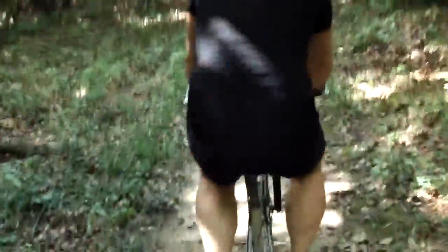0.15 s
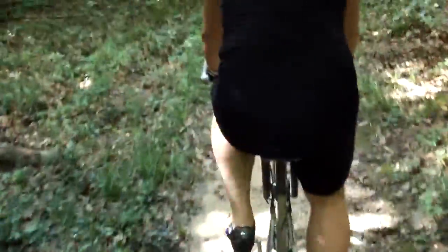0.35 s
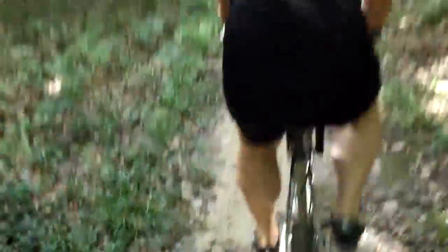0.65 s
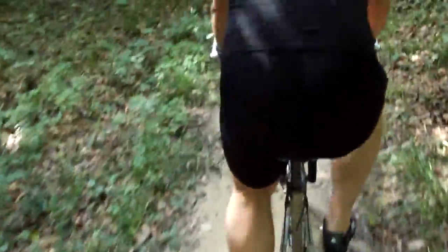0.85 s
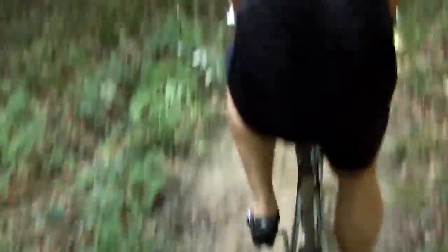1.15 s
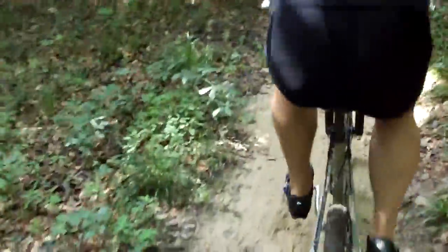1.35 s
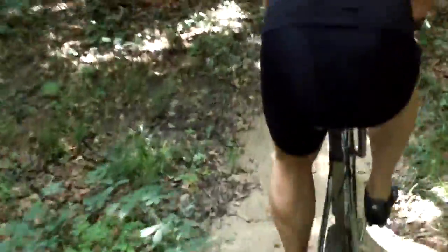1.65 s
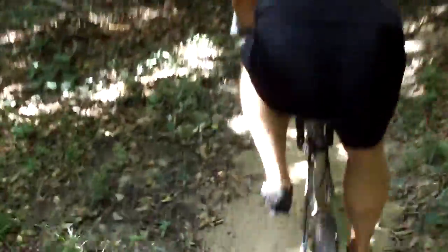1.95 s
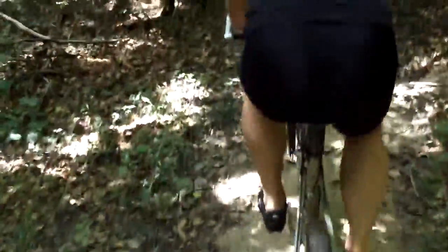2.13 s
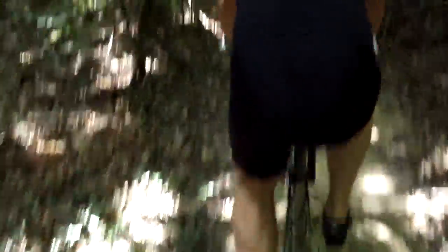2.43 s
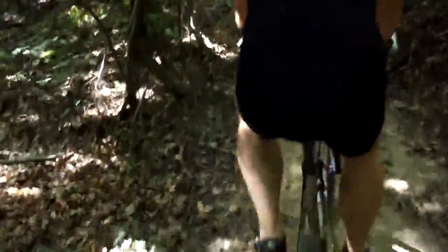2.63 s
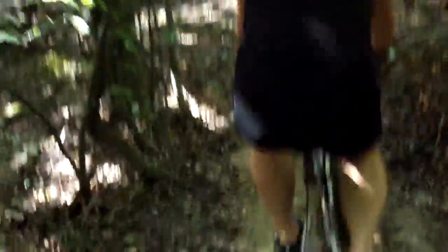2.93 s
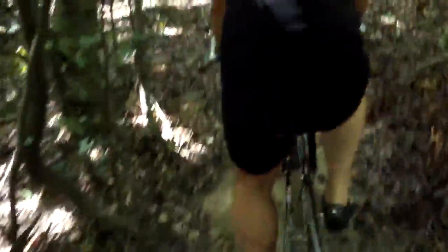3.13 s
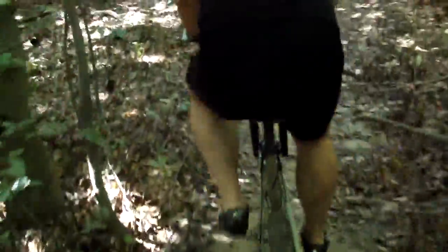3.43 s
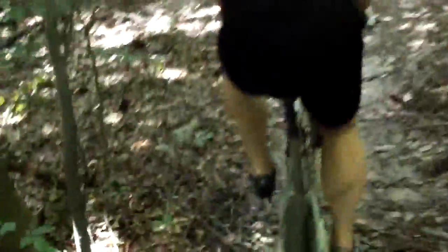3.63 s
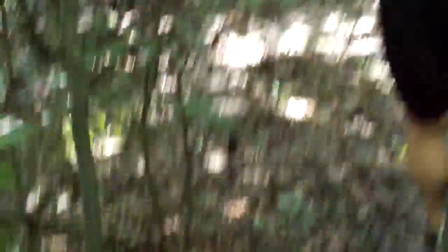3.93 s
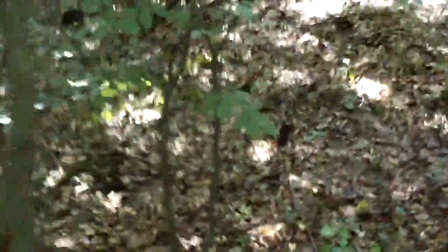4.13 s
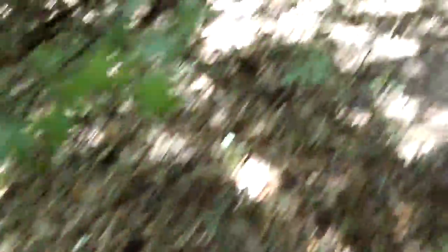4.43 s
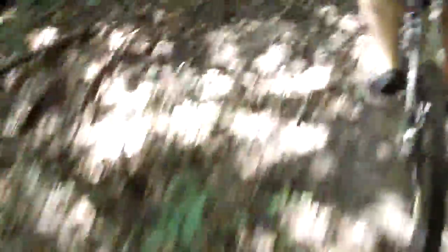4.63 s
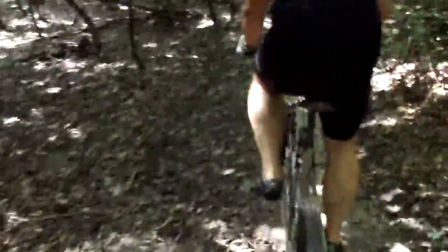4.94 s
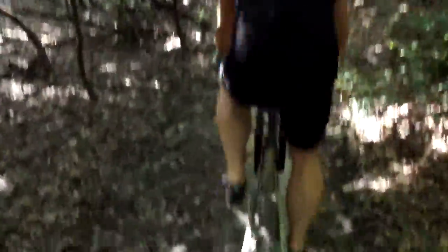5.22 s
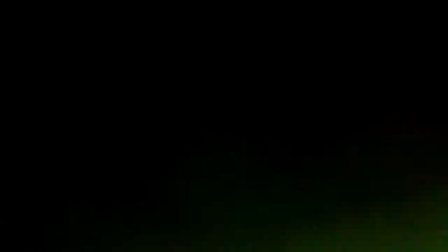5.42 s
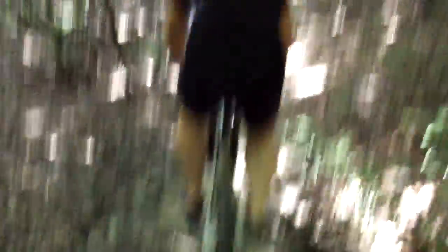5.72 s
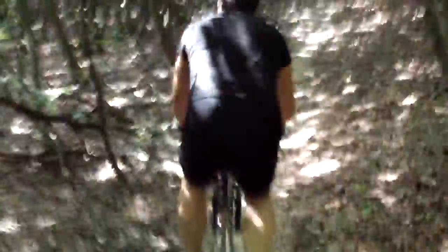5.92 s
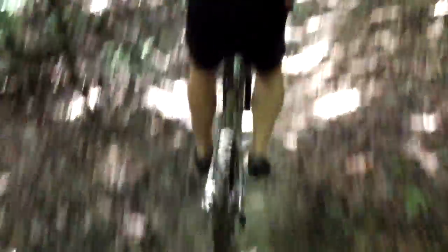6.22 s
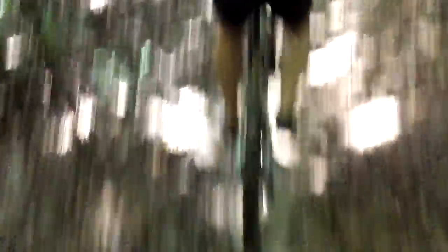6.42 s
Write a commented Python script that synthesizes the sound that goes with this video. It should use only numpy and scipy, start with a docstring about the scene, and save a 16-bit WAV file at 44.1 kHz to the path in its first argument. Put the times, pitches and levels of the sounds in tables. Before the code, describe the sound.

Steady leafy crunch and mount rattle of a mountain bike ride, a brush through twigs, a violent hollow knock, then quieter bumpy coasting.

```python
"""A leafy forest trail, heard from a camera on a mountain bike. Almost mono.
Tyres crackle over leaves (dense random pops), bumps knock the camera in its mount and sticks ring the
frame (struck resonances). Twigs snap, sharp clicks tick and one branch whacks the housing (noise bursts
through its resonances), thumps deeply and scrapes along it. Wind puffs (deep noise), a freewheel ticks
and tiny squeaks glide. Automatic gain dips after loud sound, most of all at the whack, and creeps back."""
import sys
import numpy as np
from scipy import signal
from scipy.fft import rfft, irfft, next_fast_len
from scipy.io import wavfile
from scipy.ndimage import uniform_filter1d

SR = 44100
rng = np.random.default_rng(int(sys.argv[2]) if len(sys.argv) > 2 else 0)


def int16_out(signal):
    """Quantize to a 16-bit WAV file."""
    q = np.round(np.clip(np.atleast_2d(signal).T, -1, 1) * 32767)
    wavfile.write(sys.argv[1], SR, q.astype(np.int16))


N = 289737  # length in samples


def undb(db):
    """Turn decibels into a gain."""
    return 10 ** (np.asarray(db) / 20)


def unit(x):
    """Scale a sound to an rms of 1."""
    return x / np.sqrt(np.mean(x ** 2))


def curves(table):
    """Draw each column as a line over time, using the first column as t/s."""
    s, *columns = np.transpose(table)
    t = np.arange(N) / SR
    return [np.interp(t, s, column, column[0], column[-1]) for column in columns]


def colour(x, points):
    """Shape a steady sound by a spectrum that falls off steeply past its ends; the rms becomes 1."""
    hz, db = np.transpose(points)
    size = next_fast_len(N)
    log_f = np.log(np.maximum(np.arange(size // 2 + 1) * SR / size, 1))
    below = np.maximum(np.log(hz[0]) - log_f, 0)
    above = np.maximum(log_f - np.log(hz[-1]), 0)
    gain = undb(np.interp(log_f, np.log(hz), db) - 30 * (below + above))
    return unit(irfft(rfft(x, size) * gain, size)[:N])


def ring(x, modes):
    """Drive resonances (f/Hz, width/Hz, level/dB) that pass no steady push; wider ones die sooner."""
    out = 0
    for hz, width, db in modes:
        r = np.exp(-np.pi * width / SR)
        w = 2 * np.pi * hz / SR
        out = out + undb(db) * signal.lfilter([.5, 0, -.5], [1, -2 * r * np.cos(w), r * r], x)
    return out


def soften(x, modes):
    """Pass a sound twice through its resonances: the ring swells for a few cycles and its skirts drop."""
    once = ring(x, modes)
    hit = ring(np.eye(1, 2048)[0], modes)
    return ring(once, modes) / np.abs(ring(hit, modes)).max()


def walk(rate):
    """Glide between random levels, one every 1 / rate s."""
    k = int(SR / rate)
    held = np.repeat(rng.standard_normal(N // k + 1), k)
    return uniform_filter1d(held, k)[:N]


def grains(rate, spread_db, flicker_db):
    """Leaves cracking: dense one-sample pops (rate per s) of uneven but bounded size, in patches."""
    size_db = spread_db * np.minimum(rng.exponential(size=N), 5.0)
    pops = (rng.random(N) < rate / SR) * rng.standard_normal(N) * undb(size_db)
    return pops * undb(0.8 * flicker_db * walk(24.946) + flicker_db * walk(70))


def bursts(times, db, length, spike=0., grit=0.):
    """Noise bursts that die away; spike adds a hard first contact, grit splinters the noise."""
    length = np.clip(length, .0002, .03)  # fade time in s
    size = int(8 * length.max() * SR)
    out, t = np.zeros(N + size), np.arange(size) / SR
    noise = rng.standard_normal((len(times), size))
    noise = noise * np.abs(noise) ** grit
    for s, gain, fade, grain in zip(times, undb(db), length, noise):
        blow = grain * np.exp(-t / fade) * (1 - np.exp(-t / (0.12 * fade)))
        blow = blow / np.sqrt(np.sum(blow ** 2))
        blow[0] = spike
        start = int(s * SR)
        out[start:start + size] += gain * blow
    return out[:N]


def narrow_hiss():
    """A faint, narrow band of high hiss: noise through one sharp resonance."""
    band = ring(rng.standard_normal(N), [(7940, 150, 0)])  # f/Hz, width/Hz, level/dB
    return undb(-76) * unit(band)


# wind puffs, and the deep thump of the branch's whack near 5.4 s: (middle t/s, length/s, level/dB)
PUFFS_AND_THUMP = [(1.059, 0.031, -49.5), (1.111, .04, -53), (1.215, 0.03, -48), (1.247, 0.026, -41),
                   (1.756, 0.071, -58), (2.259, 0.039, -53), (2.298, .02, -61), (3.189, 0.031, -52),
                   (3.216, 0.044, -51), (3.288, 0.047, -52.5), (3.321, 0.034, -58), (3.726, 0.043, -53),
                   (5.413, 0.032, -32), (5.46, 0.05, -29), (6.488, 0.023, -46)]
# tone of the draught, puffs and thump: (f/Hz, relative level/dB)
DEEP_TONE = [(20, 8), (50, 0), (100, -3), (170, -3), (300, -8.5), (450, -25.5)]


def wind_and_thump():
    """A light draught, wind puffs and the deep thump of the whack: deep noise that swells and fades."""
    t = np.arange(N) / SR
    swell = undb(-80.5 + 3.5 * walk(3.7))  # the draught
    for s, length, db in PUFFS_AND_THUMP:
        swell = swell + undb(db) * np.exp(-(2 * (t - s) / length) ** 4)
    return swell * colour(rng.standard_normal(N), DEEP_TONE)


# gliding chirps: (start t/s, from f/Hz, to f/Hz, peak level/dB)
CHIRPS = [(.455, 12400, 13190, -62), (.655, 10900, 9800, -56), (2.935, 12500, 13000, -66)]


def squeaks():
    """Tiny, very high chirps: short sine tones whose pitch glides."""
    size = int(.022 * SR)
    out = np.zeros(N)
    for s, from_hz, to_hz, db in CHIRPS:
        tone = np.sin(2 * np.pi * np.cumsum(np.linspace(from_hz, to_hz, size)) / SR)
        start = int(s * SR)
        out[start:start + size] += undb(db) * np.hanning(size) * tone
    return out


# turning of the freewheel: (t/s, ratchet teeth passed so far)
TEETH_PASSED = [(4.68, -4), (4.86, 0), (4.97, 4), (5.128, 8), (5.26, 12), (5.45, 16), (5.805, 25),
                (5.938, 30), (6.57, 51.3)]
# ring of the pawl: (f/Hz, width/Hz, level/dB)
PAWL_RING = [(9800, 280, -1.5), (9300, 290, -0.5), (11800, 900, -12.5), (7600, 900, -4)]
PAWL_DB, PAWL_RISE_DB_PER_S, PAWL_SPREAD_DB = -57, 3, 2.5


def freewheel():
    """While coasting, the pawl drops behind each ratchet tooth and rings briefly, louder as time goes on."""
    teeth = np.floor(curves(TEETH_PASSED)[0])
    drops = np.flatnonzero(np.diff(teeth) > 0) / SR
    rise_db = PAWL_RISE_DB_PER_S * (drops - TEETH_PASSED[0][0])
    size_db = PAWL_DB + rise_db + PAWL_SPREAD_DB * rng.standard_normal(len(drops))
    return ring(bursts(drops, size_db, np.full(len(drops), .0015)), PAWL_RING)


# rolling tyres: (t/s, crunch level/dB, rumble level/dB, crispness level/dB)
ROLLING = [(0, -48.5, -49, -59), (.13, -47.5, -53, -60.5), (.23, -44.5, -48.5, -59), (.38, -47, -56, -60),
           (.55, -44, -55.5, -58.5), (.75, -45.5, -56, -57.5), (.9, -43.5, -53, -55.5),
           (1.22, -45, -51.5, -55.5), (1.33, -51, -52, -59.5), (1.5, -44.5, -53, -53.5),
           (1.63, -48.5, -55.5, -55.5), (1.8, -45, -49, -53.5), (2.0, -46, -59.5, -57),
           (2.65, -47.5, -59.5, -56.5), (2.9, -46.5, -53.5, -55.5), (3.38, -47, -58.5, -54),
           (3.5, -44.5, -57, -49.5), (3.87, -51, -59, -57), (4.0, -49, -40.5, -48.5),
           (4.13, -43.5, -45, -50.5), (4.25, -47.5, -48, -49), (4.4, -52, -55.5, -58.5),
           (4.75, -57, -53, -62.5), (5.4, -59.5, -57, -64.5), (5.51, -60.5, -53, -63.5),
           (5.59, -50, -44, -51), (5.68, -53.5, -50.5, -61.5), (5.85, -53.5, -51.5, -61),
           (6.2, -55.5, -53, -63), (6.26, -59.5, -49, -61.5), (6.36, -53.5, -48, -63),
           (6.47, -51.5, -47.5, -53), (6.57, -65, -53, -68)]
# tone of the crunching leaves: (f/Hz, relative level/dB)
LEAF_TONE = [(530, -7.5), (900, -3.5), (1140, -6), (1240, 1.5), (1340, -2), (1700, -1.5), (2090, -2),
             (3290, 0), (7000, -24), (9100, -66), (15400, -120)]
# tone of the ground rumble: (f/Hz, relative level/dB)
GROUND_TONE = [(140, -42.5), (240, 0.5), (470, 6.5), (668, 3.5), (756, 7.5), (840, 4), (1340, 1),
               (1700, -1), (2210, -12), (3740, -120)]
# tone of the crisp top: (f/Hz, relative level/dB)
CRISP_TONE = [(3240, -5.5), (5500, -7), (8150, -11), (14100, -23), (15500, -34.5), (15800, -32.5),
              (16000, -47)]
PATCHY_DB, PATCHES_PER_S = 1, 8  # the litter lies thicker and thinner


def tyres():
    """Leaves crackle as crowds of tiny pops, the ground rumbles through the frame, and the top is crisp."""
    crunch_db, rumble_db, crisp_db = curves(ROLLING)
    patch_db = PATCHY_DB * walk(PATCHES_PER_S)
    leaves = grains(rate=9000., spread_db=-0.5, flicker_db=1.34)
    rumble = grains(rate=4000., spread_db=2.0, flicker_db=1.63)
    fine = leaves + 3.7 * grains(rate=14000., spread_db=-0.6, flicker_db=0.7)
    rumble_db = rumble_db + 1.4 * PATCHY_DB * walk(PATCHES_PER_S)  # patchier than the leaves
    return (undb(crunch_db + patch_db) * colour(leaves, LEAF_TONE)
            + undb(rumble_db) * colour(rumble, GROUND_TONE)
            + undb(crisp_db + patch_db) * colour(fine, CRISP_TONE))


# bumps through the mount: (t/s, clack level/dB, knock level/dB, thud level/dB)
JOLTS = [(0.06, -34.5, -43, -47), (0.1995, -35, -39, -46), (0.2616, -38, -41, -58),
         (0.3007, -27.5, -29.5, -39), (0.6775, -56, -42, -56), (0.9189, -33, -39, -67),
         (0.947, -31, -36, -58), (1.344, -31, -34, -42.5), (1.3611, -50, -48, -67),
         (1.515, -45, -36.5, -50), (1.6498, -28.5, -60, -41), (1.764, -39, -34, -51),
         (1.892, -55, -51, -48), (1.9746, -36, -49, -55), (2.0874, -39, -38, -52), (2.5153, -56, -42, -48),
         (2.6449, -26.5, -23.5, -42.5), (2.86, -56, -54, -47.5), (2.982, -51, -58, -47),
         (3.1087, -36.5, -49, -52), (3.4608, -60, -41, -47), (3.511, -25, -25, -36), (3.617, -34, -38, -47),
         (3.6805, -41, -42, -47), (3.761, -38, -42, -46), (3.84, -37, -33.5, -54),
         (3.9192, -36, -29.5, -50), (3.9793, -21.5, -25, -35), (4.0376, -30, -43, -43),
         (4.098, -29, -44, -44), (4.3754, -37, -41, -50), (4.519, -33, -34, -47), (4.749, -35, -32, -43.5),
         (4.881, -23, -28.5, -36), (5.008, -39, -48, -49), (5.053, -50, -39, -67), (5.0939, -39, -35, -42),
         (5.1547, -30.5, -39, -46.5), (5.2355, -35.5, -43, -50), (5.3462, -36, -38.5, -46.5),
         (5.5369, -20, -24, -38.5), (5.5898, -28, -23, -42), (5.6734, -38, -34, -43),
         (5.7227, -23.5, -27.5, -34.5), (5.895, -26.5, -28, -39), (5.9061, -33, -30.5, -39),
         (5.9746, -30, -32, -40.5), (6.112, -48, -37, -65), (6.1623, -36.5, -54, -68),
         (6.241, -40, -38, -44), (6.249, -33.5, -29, -41), (6.289, -27.5, -30, -43), (6.331, -38, -54, -59),
         (6.382, -23.5, -27.5, -38.5), (6.438, -30.5, -31, -43), (6.5149, -26.5, -27, -41)]
# the camera against its clamp: (f/Hz, width/Hz, level/dB)
CLAMP_RING = [(1308, 177, 5), (1126, 144, 0.5)]
# the bracket: (f/Hz, width/Hz, level/dB)
BRACKET_RING = [(563, 240, 1.5), (820, 270, -4.5), (348, 180, -1)]
# the camera rocking on the bracket: (f/Hz, width/Hz, level/dB)
ROCKING = [(177.4, 24.7, 2.5), (156, 23, -4)]


def bumps():
    """Each jolt clacks the camera, knocks the bracket and rocks the mount; small jolts come at random."""
    s, clack_db, knock_db, thud_db = np.transpose(JOLTS)
    at = (s * SR).astype(int)
    clack = np.zeros(N)
    clack[at] = undb(clack_db)
    small_db = curves(ROLLING)[1] - 9.0 + 1.8 * rng.standard_normal(N)  # follows the ground rumble
    jolts = (rng.random(N) < 30. / SR) * undb(small_db)
    jolts[at] = undb(thud_db)
    push = np.hanning(int(0.0024 * SR))  # the mount gives way softly
    thud = ring(np.convolve(jolts, push / push.sum())[:N], ROCKING)
    # the stiff bracket passes no slow sway
    thud = signal.sosfilt(signal.butter(2, 135, "high", fs=SR, output="sos"), thud)
    knock = soften(bursts(s, knock_db, np.full(len(s), .002)), BRACKET_RING)
    return soften(clack, CLAMP_RING) + knock + thud


# hollow knocks, as of a stick on the frame: (t/s, low level/dB, high level/dB, fade time/s)
HOLLOW_KNOCKS = [(.262, -45, -31, 0.011), (.414, -46, -31, 0.0085), (1.244, -32, -58, 0.005),
                 (1.349, -31.5, -33.5, 0.027), (1.7, -36, -45, 0.0066), (3.835, -38, -36, 0.009),
                 (4.14, -45, -33, 0.009), (4.526, -34.5, -29.5, 0.029), (4.607, -37.5, -43, 0.014),
                 (4.732, -30.5, -43, 0.0097), (5.405, -13.5, -7, 0.019), (5.886, -40, -31.5, .003),
                 (5.966, -35, -30.5, 0.0081)]
# the frame, low then high: (f/Hz, width/Hz, level/dB)
FRAME_RING = [(383, 57, 0.5), (799, 110, 3)]


def frame():
    """Two long, low resonances kept going by a short scuff of noise."""
    s, low_db, high_db, length = np.transpose(HOLLOW_KNOCKS)
    low = ring(bursts(s, low_db, length), FRAME_RING[:1])
    return low + ring(bursts(s, high_db, length), FRAME_RING[1:])


# hollow ring of the camera housing: (f/Hz, width/Hz, level/dB)
HOUSING_RING = [(350, 520, 8.5), (524, 300, 2), (830, 750, -2), (877, 354, 0), (1025, 440, -1.5),
                (1300, 680, 6)]
# bright crack of a blow: (f/Hz, width/Hz, level/dB)
CRACK_RING = [(2224, 1200, -0.5), (3180, 1280, -5), (4490, 2200, -5.5), (1750, 450, -16), (6230, 1800, -18)]


def housing(s, crack_db, ring_db, treble_db, spot_hz, length):
    """A blow gives a bright crack, a hollow ring of the housing and a spit of treble."""
    length = np.full(len(s), length)
    crack = soften(bursts(s, crack_db, length, spike=0.57, grit=1.1), CRACK_RING)
    hollow = 0
    for mode in HOUSING_RING:
        # the spot that is struck favours the resonances near its own pitch
        distance = np.abs(np.log(mode[0] / spot_hz))
        mode_db = ring_db - 29.8 * distance + mode[2]
        hollow = hollow + soften(bursts(s, mode_db, .5 * length), [mode])
    treble_ring = [(8140, 4100, 9.5), (12100, 3500, -15.5)]  # f/Hz, width/Hz, level/dB
    spit = soften(bursts(s, treble_db, length, spike=0.23, grit=1.5), treble_ring)
    return crack + hollow + spit


# very short, sharp clicks on the housing, some at the onset of a snap: (t/s, crack level/dB)
CLICKS = [(0.4143, -24), (.6166, -34.5), (0.7393, -45), (.7557, -38), (3.5438, -26), (4.136, -16.5),
          (5.4804, -19), (5.5132, -28), (5.5524, -23.5), (5.661, -37.5), (5.722, -27), (5.74, -29.5),
          (5.7933, -39.5), (6.5071, -31.5), (6.5297, -35), (6.5362, -36), (6.5424, -36.5)]
TICK_S, TICK_SPOT_HZ = 0.00053, 886  # fade time of the crack, pitch of the struck spot
TICK_RING_DB, TICK_TREBLE_DB = -8, -12.5  # relative to the crack
STRAY_TICKS, STRAY_DB, STRAY_SPREAD_DB = 200, 15, 7  # how many in all, least level above crispness, range


def ticks():
    """Very short, sharp clicks, some at the onset of a snap; small random ones are louder in crisp litter."""
    s, db = np.transpose(CLICKS)
    chance = rng.random((STRAY_TICKS, 2))
    at = (chance[:, 0] * N).astype(int)
    stray_db = curves(ROLLING)[2][at] + STRAY_DB + STRAY_SPREAD_DB * chance[:, 1]
    s, db = np.append(s, at / SR), np.append(db, stray_db)
    return housing(s, db, db + TICK_RING_DB, db + TICK_TREBLE_DB, TICK_SPOT_HZ, TICK_S)


SNAP_S = 0.0042  # fade time of a snap's crack
# a stretch of undergrowth: start and end, number of twigs, least crack level and its range
BRUSH_FROM_S, BRUSH_TO_S, BRUSH_TWIGS, BRUSH_DB, BRUSH_SPREAD_DB = 3.9, 4.33, 45, -40.5, 6.5
BRUSH_RING_DB, BRUSH_TREBLE_DB = -7, -12  # relative to the crack
BRUSH_LOW_HZ, BRUSH_HIGH_HZ = 600, 1400  # pitch range of the struck spots


def brush():
    """Undergrowth brushes past: small snaps at random times, each on its own spot of the housing."""
    when, size, spot = rng.random((BRUSH_TWIGS, 3)).T
    s = BRUSH_FROM_S + (BRUSH_TO_S - BRUSH_FROM_S) * when
    db = BRUSH_DB + BRUSH_SPREAD_DB * size
    spot_hz = BRUSH_LOW_HZ * (BRUSH_HIGH_HZ / BRUSH_LOW_HZ) ** spot
    return housing(s, db, db + BRUSH_RING_DB, db + BRUSH_TREBLE_DB, spot_hz, SNAP_S)


# twigs and the branch on the housing:
# (t/s, crack level/dB, housing ring level/dB, treble level/dB, pitch of the struck spot f/Hz)
SNAPS = [(0.3557, -45, -52, -56, 900), (0.4128, -32.5, -32, -65, 830), (1.346, -28.5, -36, -54, 1030),
         (2.5813, -39, -42, -37, 780), (2.9, -34, -60, -36, 1030), (3.5443, -19, -53, -26.5, 780),
         (3.908, -34, -50, -35, 1310), (3.939, -19.5, -41, -22.5, 1400), (3.947, -27, -28, -26, 970),
         (3.9974, -20, -38, -48, 940), (4.011, -16, -23.5, -41, 1090), (4.018, -19, -21, -46, 980),
         (4.0315, -15, -24.5, -47, 1040), (4.1345, -15.5, -25, -13, 970), (4.1636, -29, -41, -47, 1280),
         (4.17, -27.5, -29, -48, 792), (4.2034, -19.5, -23.5, -46, 1050), (4.2372, -42, -38, -45, 800),
         (4.2707, -15, -34, -21.5, 378), (4.6754, -36, -49, -40, 760), (4.7723, -36, -52, -57, 1190),
         (4.8806, -32, -39, -38, 1310), (5.393, 1, -12.5, -7.5, 486), (5.4007, -7, -6.5, -21.5, 840),
         (5.4093, -4, 3.5, -13, 852), (5.4132, 0, -5.5, -25.5, 433), (5.4197, -7.5, -14.5, -23.5, 600),
         (5.431, -12.5, -16.5, -15.5, 800), (5.449, -10.5, -13.5, -37, 1020), (5.4581, -12, -13, -41, 540),
         (5.463, -26, -10, -41, 550), (5.5694, -21, -28, -27, 820), (6.3763, -28.5, -39, -55, 374),
         (6.409, -25, -33, -47, 1140), (6.4524, -25, -46, -30.5, 1150)]
DRAG_S, DRAG_RISE_S, DRAG_END_S = 5.393, 0.016, 5.492  # the branch scraping along
DRAG_DB, DRAG_FADE_DB_PER_S = -20, 109.5


def twigs():
    """Twigs snap on the housing; the branch whacks it and scrapes along it as a fading crackle."""
    scrape = grains(rate=6000.0, spread_db=3.0, flicker_db=4.0)
    drag = unit(soften(scrape, HOUSING_RING[:4])) + 0.45 * unit(soften(scrape, CRACK_RING))
    drag = drag + 0.08 * unit(np.diff(scrape, prepend=0))  # a little treble
    t = np.arange(N) / SR
    since = t - DRAG_S
    rise = np.clip(since / DRAG_RISE_S, 0, 1) * (t < DRAG_END_S)
    fade_db = DRAG_FADE_DB_PER_S * np.clip(since - DRAG_RISE_S, 0, 1)
    return housing(*np.transpose(SNAPS), SNAP_S) + rise * undb(DRAG_DB - fade_db) * drag


def scene():
    """Add all the sources; both channels hear nearly the same, and the low end differs a little."""
    mid = tyres() + bumps() + frame() + twigs() + brush() + ticks()
    mid = mid + wind_and_thump() + freewheel() + narrow_hiss() + squeaks()
    scatter = rng.standard_normal(256) * np.exp(-np.arange(256) / 80) / 7
    low = signal.sosfilt(signal.butter(2, 1000, fs=SR, output="sos"), np.convolve(mid, scatter)[:N])
    side = undb(-32.5) * low + 0.004 * mid
    return np.array([mid + side, mid - side])


DUCK_ABOVE_DB, DUCK_MOST_DB, DUCK_WINDOW_S = -32, 19.5, 0.014  # threshold, deepest dip, loudness window
DUCK_ATTACK_S, DUCK_RELEASE_DB_PER_S = 0.035, 29


def duck(x):
    """Gain control: loud sound pulls the gain down within moments; it climbs back at an even rate."""
    power = uniform_filter1d(np.mean(x ** 2, axis=0), int(DUCK_WINDOW_S * SR))
    level_db = 10 * np.log10(np.abs(power) + 1e-12)
    over_db = np.clip(level_db - DUCK_ABOVE_DB, 0, DUCK_MOST_DB)
    climb_db = DUCK_RELEASE_DB_PER_S * np.arange(N) / SR
    held_db = np.maximum.accumulate(over_db + climb_db) - climb_db
    r = np.exp(-1 / (DUCK_ATTACK_S * SR))
    dip_db = signal.lfilter([(1 - r) ** 2], [1, -2 * r, r * r], held_db)  # smoothed twice
    return x * undb(-dip_db)


# tone of the noise shared by both channels: (f/Hz, relative level/dB)
SHARED_NOISE_TONE = [(20, -1), (60, -6), (200, -17), (1000, -37), (8000, -46), (15500, -38.5)]
# tone of each channel's own hiss: (f/Hz, relative level/dB)
HISS_TONE = [(1000, -12.5), (5000, -8), (9000, -0.5), (13000, 4.5), (15500, -2)]


def record(dry):
    """Gain control, a hard limit on peaks, less deep bass, noise and separate hisses, then a cut top."""
    limited = np.clip(duck(dry), -1, 1)
    thin = signal.sosfilt(signal.butter(2, 90, "high", fs=SR, output="sos"), limited)
    hiss = np.array([colour(rng.standard_normal(N), HISS_TONE) for _ in dry])
    shared = colour(rng.standard_normal(N), SHARED_NOISE_TONE)
    noisy = thin + undb(-82.5) * shared + undb(-79.5) * hiss
    top_cut = signal.ellip(10, .2, 80, 15600, fs=SR, output="sos")  # steep cut above 15600 Hz
    return np.clip(signal.sosfilt(top_cut, noisy), -1, 1)


dry = scene()
out = record(dry)
int16_out(out)
```